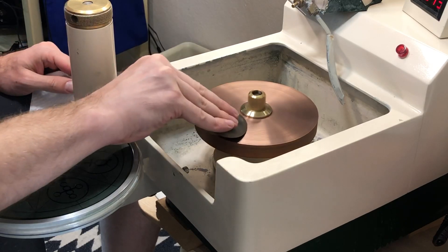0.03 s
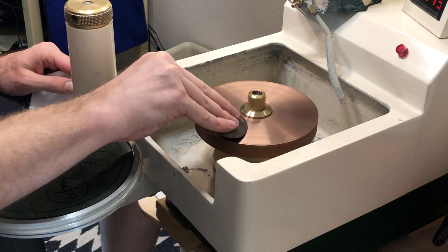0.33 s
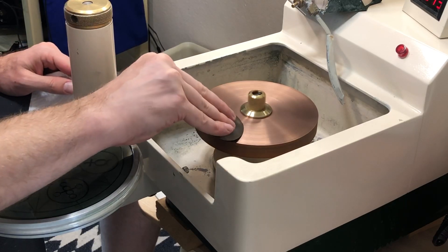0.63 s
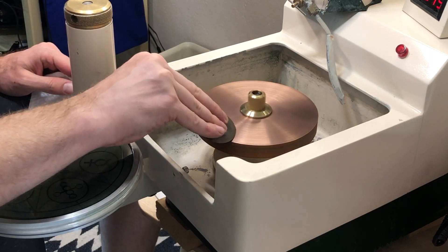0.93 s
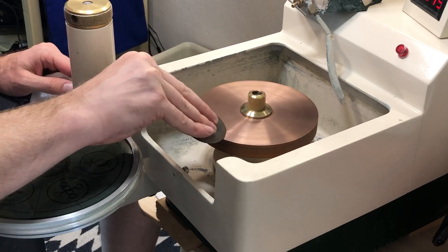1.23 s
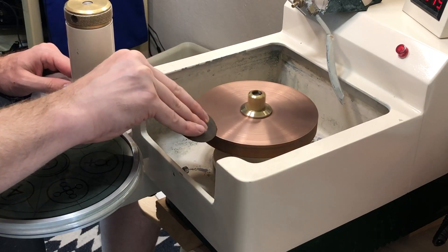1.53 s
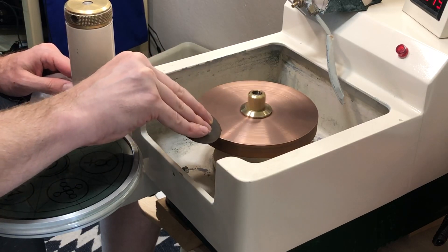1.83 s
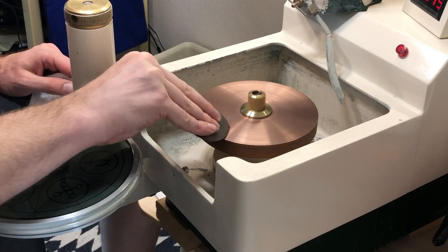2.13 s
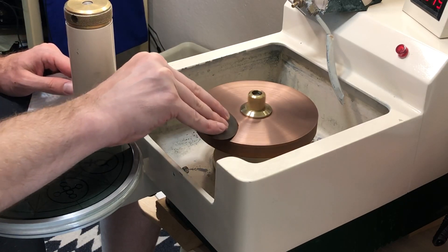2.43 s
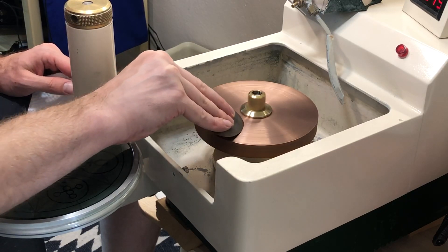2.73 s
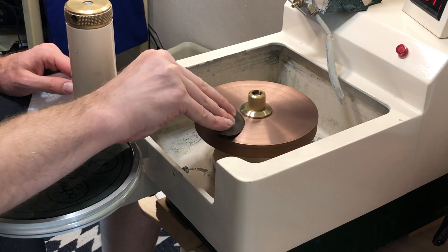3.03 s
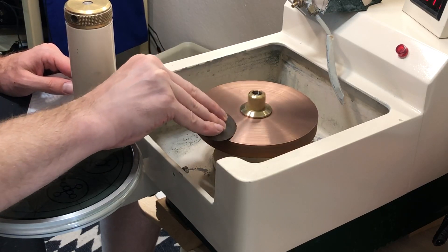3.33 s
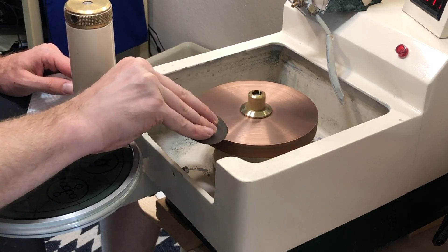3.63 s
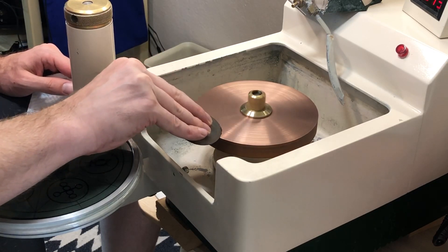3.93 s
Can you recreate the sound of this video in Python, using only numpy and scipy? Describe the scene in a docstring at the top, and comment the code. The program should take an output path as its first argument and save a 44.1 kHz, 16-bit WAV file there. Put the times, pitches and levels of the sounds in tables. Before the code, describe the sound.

A metal piece rubs on a spinning metal disc, making a close, continuous, gritty hiss with a slight metallic ring. In the first half second it catches with brief rasps and squeaks. The scrape thins between about 1 and 2 seconds, grows fuller and louder from 2.3 seconds, then thins again from 3.5 to 4 seconds. A faint motor hum and whine run underneath throughout.

```python
"""A flat metal piece rubs on a spinning metal lapping disc, slid from hub to rim, back and out again.
Grit under it hisses through the resonances of disc and piece, which change with position;
the further the piece lies on the disc, the fuller the scrape. Early on it catches and chatters.
The motor hums underneath and the splash tub adds a short echo. Mono."""
import sys
import numpy as np
from scipy import signal
from scipy.fft import rfft, irfft, next_fast_len
from scipy.io import wavfile
from scipy.ndimage import map_coordinates

SR = 44100
rng = np.random.default_rng(int(sys.argv[2]) if len(sys.argv) > 2 else 0)


def pcm_store(signal):
    """Save signal as 16-bit PCM."""
    levels = np.round(np.clip(np.atleast_2d(signal), -1, 1) * 32767)
    wavfile.write(sys.argv[1], SR, levels.astype(np.int16).T)


N = 176400

# path of the piece: time_s, position (0 over the rim, 1 near the hub)
POSITION = [(0, 0.95), (.25, 1), (.55, 0.66), (.89, 0.79), (.93, 0.57), (1.3, 0.31), (1.7, 0.19), (2, .17),
            (2.3, 0.73), (2.6, 0.89), (2.95, 0.9), (3.25, 0.85), (3.5, 0.62), (4, 0.27)]
# hiss envelope, before HISS_GAIN_DB: time_s, level_db
HISS_LEVEL = [(0.0, -33), (0.26, -36.5), (0.31, -32.5), (0.36, -39), (0.39, -30), (0.44, -36),
              (0.62, -36.5), (0.67, -31.5), (0.69, -35), (0.78, -32), (0.82, -34.5), (0.9, -33),
              (0.93, -35.5), (1.06, -33.5), (1.11, -35), (1.15, -34.5), (1.19, -35.5), (1.31, -36.5),
              (1.4, -35), (1.47, -37.5), (1.55, -36.5), (1.69, -39), (1.95, -34), (2.12, -33.5),
              (2.32, -30), (3.02, -32), (3.41, -30), (3.55, -29.5), (3.58, -33), (3.62, -29.5),
              (3.67, -31.5), (4.0, -33.5)]
# scrape envelope, before SCRAPE_GAIN_DB: time_s, level_db
SCRAPE_LEVEL = [(0, -35.5), (.13, -33.5), (.25, -34.5), (.35, -35), (.4, -35), (.58, -41.5), (.7, -38.5),
                (.9, -40), (.93, -43.5), (1.3, -48), (1.72, -49.5), (2.1, -42.5), (2.43, -38), (2.75, -35),
                (3, -34), (3.22, -32.5), (3.4, -39.5), (3.65, -43.5), (4, -46.5)]
# hiss spectrum: freq_hz, relative_db
HISS_SPECTRUM = [(500, -48), (1800, -18), (3000, -8.5), (4000, -5.5), (5000, -2.5), (6000, -0.5),
                 (7200, -0.5), (8600, -0.5), (10000, -1), (11500, 1.5), (13000, -2), (15700, -1)]
# scrape spectrum: freq_hz, relative_db
SCRAPE_SPECTRUM = [(400, -37), (1200, -25.5), (1800, -15), (2300, -12), (2750, -6.5), (3200, 4.5),
                   (3800, -4), (4800, -6.5), (6500, -6.5), (10000, -24)]
# hiss change at the hub, before hub_depth: freq_hz, change_db
HUB_DULLING = [(5000, 0), (9000, 2.5), (12000, -3), (15000, -4.5)]
# resonances at any position, before DISC_DEPTH: freq_hz, sigma_hz, lift_db
DISC_MODES = [(1990, 5.1, 3), (2233, 27, 9.5), (2338, 25, 10), (2472, 18, -4), (2491, 10.7, 18),
              (2570, 15, 3), (2666, 33, 5), (2938, 7.1, 8.5), (3100, 12, -13), (3270, 15, 5), (3360, 26, 6),
              (3493, 30, 5), (3620, 30, -2), (3830, 9, 9.5), (3975, 75, 5), (4440, 14, 4), (4435, 7.3, 2),
              (4530, 20, 3.5), (4573, 14, 5), (4630, 13, 6), (4930, 36, 6.5), (5490, 19, 5), (6650, 48, 5),
              (7210, 68, 3.5)]
# freer ringing of the piece at full overhang: freq_hz, sigma_hz, lift_db
OVERHANG_MODES = [(2040, 82, -2.5), (2417, 53, -12), (3070, 150, -8.5), (3460, 90, 3), (4036, 65, 7.5),
                  (4460, 110, 3.5), (5910, 620, -5.5), (7010, 80, 6.5), (15300, 220, 3.5)]
# passing resonances as the contact shifts, before CONTACT_DEPTH:
# freq_hz, sigma_hz, lift_db, peak_s, sigma_s
CONTACT_MODES = [(3900, 580, 3, 2.89, 0.14), (5480, 98, 5, 0.89, 0.23), (3400, 110, -4.5, 0.12, 0.15),
                 (5750, 580, 2, 0.12, .2), (14800, 820, 3.5, .2, 0.12), (2170, 260, 6, 2.87, 0.25),
                 (4080, 54, 3.5, 3.8, 0.22), (4060, 60, 8, 1.15, .03), (4400, 60, 5, 2.04, 0.081),
                 (9330, 210, 7.5, 0.79, 0.074), (9100, 190, 8, 1.04, 0.08), (10570, 340, 5, 0.8, 0.22),
                 (14100, 190, 9, 0.94, 0.18), (11900, 200, 5, 1.7, 0.37), (11200, 220, -7, 1.5, 0.24),
                 (13600, 1000, -2.5, 1.55, 0.39), (7800, 160, 4.5, 1.9, 0.6), (10860, 310, 5.5, 2.28, 0.1),
                 (11200, 240, 5, 2.46, 0.11), (10170, 250, -3.5, 3.1, 0.39), (8960, 170, 3.5, 2.8, 0.37),
                 (8100, 140, 2, 2.4, 0.47), (14600, 870, -5, 2.94, 0.21), (10920, 140, 4, 2.76, 0.14),
                 (11560, 240, 5, 3.33, 0.14), (10900, 190, 4.5, 3.44, 0.18), (8400, 210, 6, 3.78, 0.26),
                 (11650, 350, 3.5, 3.78, 0.2), (14050, 150, 7, 3.46, 0.14)]
# stick-slip events: start_s, length_s, level_db, pitch_hz, sigma_octaves
CATCHES = [(-.02, 0.18, -47, 1380, 0.36), (-.02, 0.23, -45, 2180, 0.069), (0.152, 0.032, -33, 3030, 0.066),
           (0.156, 0.055, -37, 2220, 0.096), (0.175, .04, -37.5, 2760, .24),
           (0.217, 0.1, -42.5, 1710, 0.36), (0.38, 0.014, -36, 3600, 0.37)]
# motor hum, before LOW_HUM_SWELL: pitch_hz, level_db
HUM_LINES = [(75.4, -69), (113.0, -66), (209.9, -57.5), (355.3, -64.5), (387.6, -64.5), (500.6, -66),
             (947.5, -70)]
# drive whine: pitch_hz, level_db
WHINE_LINES = [(2325, -61), (3499, -52), (3999.5, -56), (7965, -53), (7999, -67)]
# swell of the lines below LOW_HUM_BELOW_HZ: time_s, change_db
LOW_HUM_SWELL = [(0, 0), (.7, 5.5), (1.15, -2), (1.65, 6.5), (2.2, -6), (2.8, 6.5), (3.2, 4), (3.5, -10),
                 (4, -5)]
# motor housing resonances: freq_hz, sigma_hz, level_db
HOUSING_MODES = [(148.5, 2.7, -70), (196, 21, -57), (518, 5.8, -72.5), (863, 74, -66)]
# motor rumble spectrum: freq_hz, relative_db
RUMBLE_SPECTRUM = [(25, -39), (45, 0.5), (70, -5), (130, 1.5), (200, 0), (320, 2), (450, -4.5), (700, -5),
                   (1200, -8), (2500, -13), (8000, -21.5)]

HISS_GAIN_DB, SCRAPE_GAIN_DB = 1.5, 1.5
GRIT_PER_S, GRIT_SHARE_DB, GRIT_SPREAD_DB = 1200, -9.5, 0.5
DISC_DEPTH, CONTACT_DEPTH = 0.83, 1.17
RIPPLE_DB, RIPPLE_STEP_HZ, RIPPLE_STEP_S = 2.5, 69.66, 0.247
CATCH_ATTACK_S, CATCH_RELEASE_S, CHATTER_PER_S, CHATTER_DB = 0.0043, 0.013, 87, 2
LOW_HUM_BELOW_HZ, RUMBLE_DB = 130, -53
TUB_T60_S, TUB_DB = .12, -15
TOP_HZ = 15750


def amp(db):
    """Decibels to gain."""
    return 10 ** (np.asarray(db) / 20)


def unit_rms(x):
    """Scale to rms 1."""
    return x / np.sqrt(np.mean(x ** 2) + 1e-20)


def freq_curve(rows, hz):
    """Interpolate (freq_hz, value) rows on a log axis."""
    freqs_hz, values = np.transpose(rows)
    return np.interp(np.log(hz + 1), np.log(freqs_hz + 1), values)


def time_curve(rows, t):
    """Interpolate (time_s, value) rows linearly."""
    return np.interp(t, *np.transpose(rows))


def bell(x, centre, sigma):
    """Gaussian of height 1."""
    return np.exp(-.5 * ((x - centre) / sigma) ** 2)


def wobble(knots_per_s):
    """Smooth random curve."""
    return map_coordinates(rng.standard_normal(N // 8), [np.arange(N) * knots_per_s / SR], mode="wrap")


def filtered(x, response):
    """Apply the gain response(hz)."""
    size = next_fast_len(N + SR // 2)
    return irfft(rfft(x, size) * response(np.fft.rfftfreq(size, 1 / SR)), size)[:N]


def noise(response):
    """Coloured noise, rms 1."""
    return unit_rms(filtered(rng.standard_normal(N), response))


def friction(rough_db):
    """Countless tiny contacts in uneven clumps, plus single larger grains of grit."""
    fine = rng.standard_normal(N) * amp(rough_db * wobble(420))
    grain_sizes = amp(GRIT_SPREAD_DB * rng.standard_normal(N)) * rng.choice([-1, 1], N)
    grit = grain_sizes * (rng.random(N) < GRIT_PER_S / SR)
    return unit_rms(unit_rms(fine) + amp(GRIT_SHARE_DB) * unit_rms(grit))


def ripple_db(hz, t):
    """Many weak resonances come and go as the contact shifts."""
    knots = rng.standard_normal((512, 64))
    grid = np.broadcast_arrays(hz / RIPPLE_STEP_HZ, t / RIPPLE_STEP_S)
    return RIPPLE_DB * map_coordinates(knots, grid, mode="wrap")


def metal_resonance(force, spectrum, hub_depth):
    """Disc and piece colour the friction according to position, at constant power."""
    frames = dict(fs=SR, nperseg=4096, noverlap=3072)
    hz, t, force_stft = signal.stft(force, **frames)
    hz = hz[:, None]
    near_hub = np.clip(time_curve(POSITION, t), 0, 1) ** 2
    db = freq_curve(spectrum, hz) + hub_depth * near_hub * freq_curve(HUB_DULLING, hz)
    db += DISC_DEPTH * sum(lift * bell(hz, freq, sigma) for freq, sigma, lift in DISC_MODES)
    db += (1 - near_hub) * sum(lift * bell(hz, freq, sigma) for freq, sigma, lift in OVERHANG_MODES)
    db += CONTACT_DEPTH * sum(lift * bell(hz, freq, sigma) * bell(t, peak_s, sigma_s)
                              for freq, sigma, lift, peak_s, sigma_s in CONTACT_MODES)
    gain = amp(db + ripple_db(hz, t)) * (hz < TOP_HZ)
    gain /= np.sqrt(np.mean(gain ** 2, axis=0))
    return signal.istft(force_stft * gain, **frames)[1][:N]


def rubbing(t):
    """Hiss and lower scrape; the pressure flutters under the hand."""
    pressure_db = .5 * wobble(30.16) + 0.36 * wobble(110)
    hiss = metal_resonance(friction(rough_db=1.18), HISS_SPECTRUM, hub_depth=0.87)
    hiss *= amp(time_curve(HISS_LEVEL, t) + HISS_GAIN_DB)
    scrape = metal_resonance(friction(rough_db=0.4), SCRAPE_SPECTRUM, hub_depth=0)
    scrape *= amp(time_curve(SCRAPE_LEVEL, t) + SCRAPE_GAIN_DB)
    return amp(pressure_db) * (hiss + scrape)


def catches(t):
    """Stick-slip rasps and squeaks; each dies away as the piece frees itself."""
    out = np.zeros(N)
    for start_s, length_s, level_db, pitch_hz, sigma_octaves in CATCHES:
        attack = np.clip((t - start_s) / CATCH_ATTACK_S, 0, 1)
        release = np.exp(-np.maximum(t - start_s - length_s, 0) / CATCH_RELEASE_S)
        rasp = noise(lambda hz: bell(np.log2(hz + 1), np.log2(pitch_hz), sigma_octaves))
        chatter = amp(CHATTER_DB * wobble(CHATTER_PER_S))
        out += amp(level_db) * attack * release * unit_rms(rasp * chatter)
    return out


def motor(t):
    """Slightly unsteady hum and whine, a droning housing and a soft rumble."""
    swell = amp(time_curve(LOW_HUM_SWELL, t))
    lines = np.zeros(N)
    for pitch_hz, level_db in HUM_LINES + WHINE_LINES:
        rms = amp(level_db + 0.31 * wobble(6.8)) * (swell if pitch_hz < LOW_HUM_BELOW_HZ else 1)
        phase_rad = 2 * np.pi * pitch_hz * t + 0.3 * wobble(4.06)
        lines += rms * np.sqrt(2) * np.sin(phase_rad)
    drone = sum(amp(db) * noise(lambda hz: bell(hz, freq, sigma)) for freq, sigma, db in HOUSING_MODES)
    rumble = amp(RUMBLE_DB) * noise(lambda hz: amp(freq_curve(RUMBLE_SPECTRUM, hz)))
    return lines + drone + rumble


def tub_echo(x):
    """The splash tub and near walls add a short dense echo."""
    t = np.arange(SR // 3) / SR
    tail = rng.standard_normal(len(t)) * amp(-60 * t / TUB_T60_S) * (t > .001)
    echo = signal.fftconvolve(x, tail / np.linalg.norm(tail))[:N]
    return (x + amp(TUB_DB) * echo) / np.sqrt(1 + amp(TUB_DB) ** 2)


def scene():
    """Rubbing and catches in the tub, over the motor; both channels alike."""
    t = np.arange(N) / SR
    mono = tub_echo(rubbing(t) + catches(t)) + motor(t)
    return np.array([mono, mono])


def record(dry):
    """Brick-wall low-pass at TOP_HZ."""
    return np.array([filtered(channel, lambda hz: hz < TOP_HZ) for channel in dry])


dry = scene()
out = record(dry)
pcm_store(out)
```